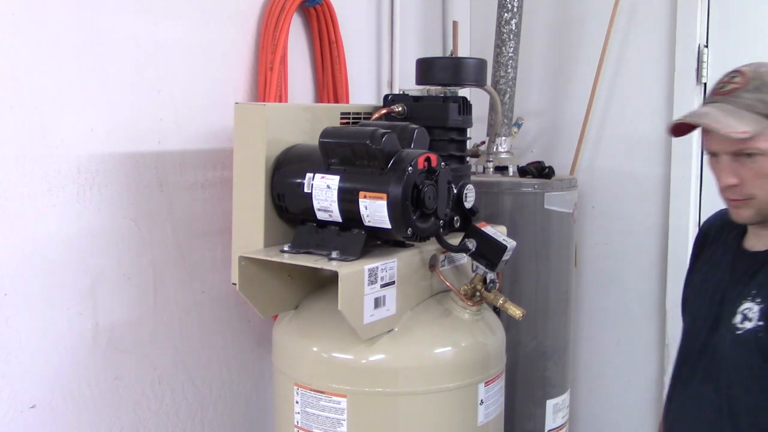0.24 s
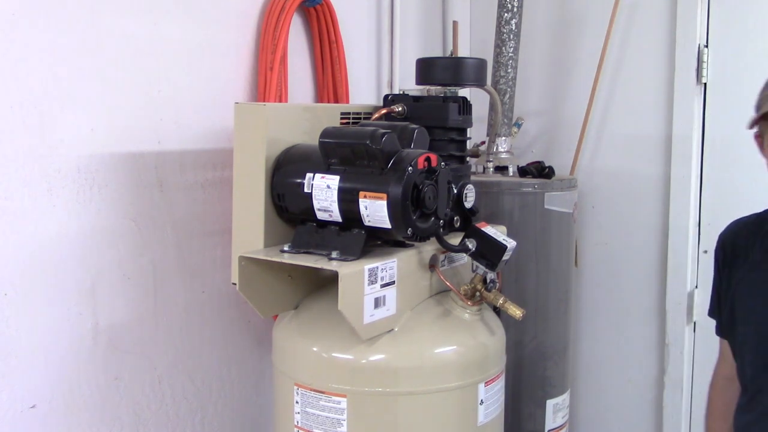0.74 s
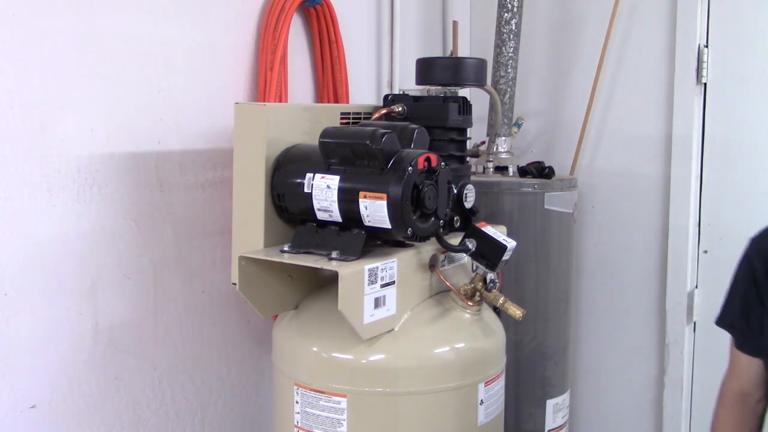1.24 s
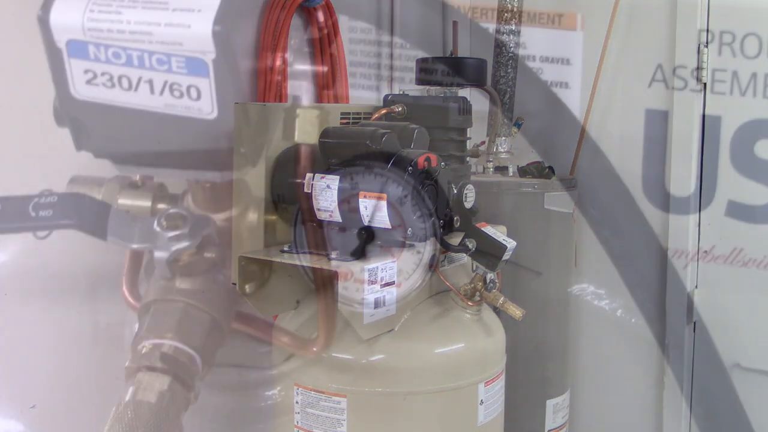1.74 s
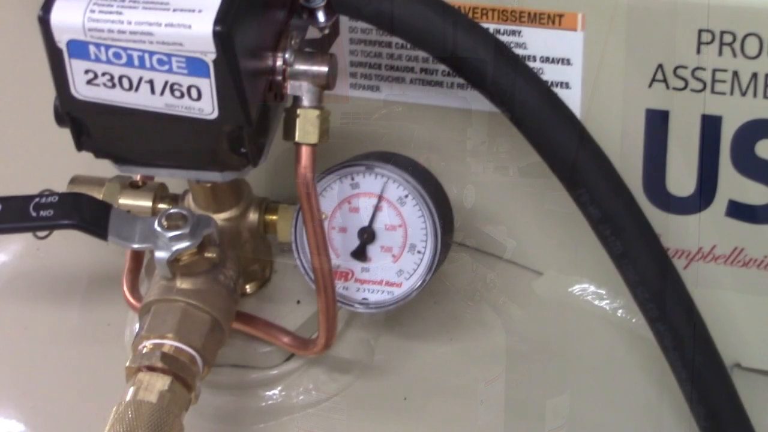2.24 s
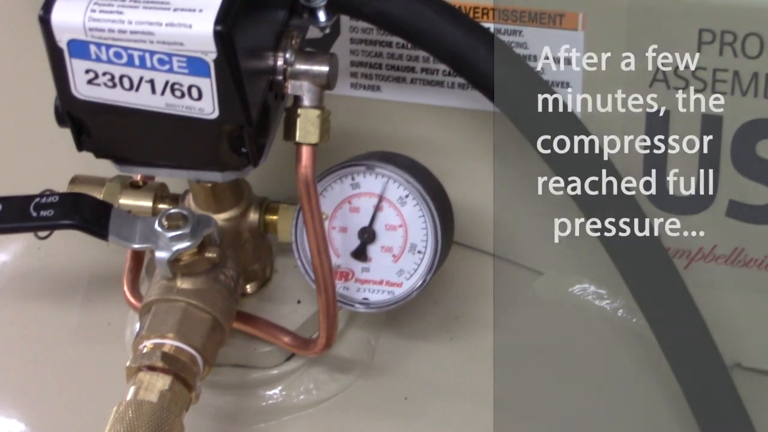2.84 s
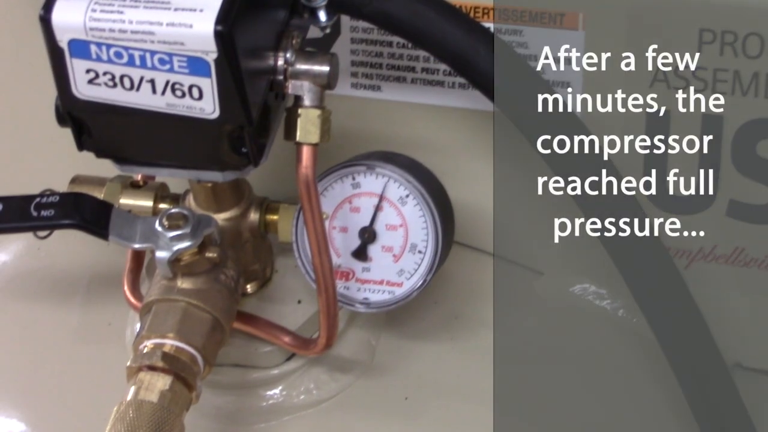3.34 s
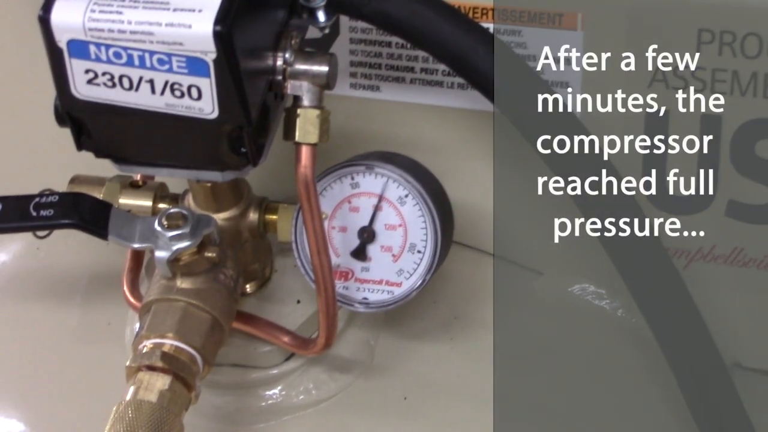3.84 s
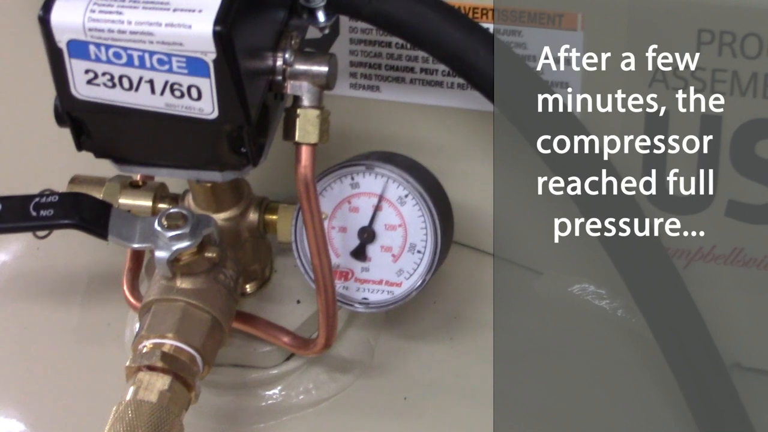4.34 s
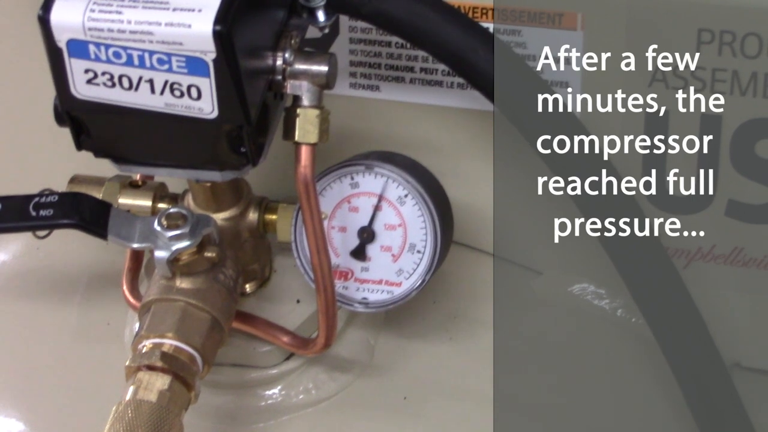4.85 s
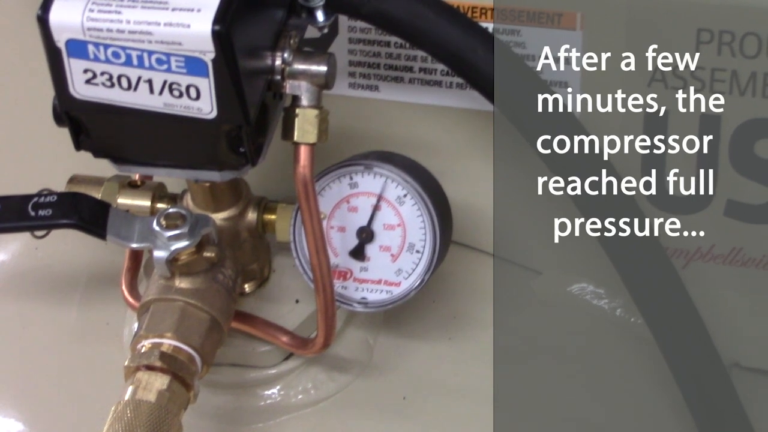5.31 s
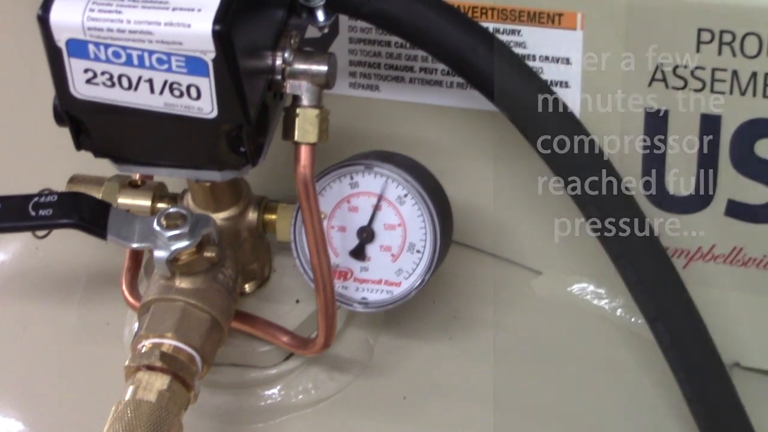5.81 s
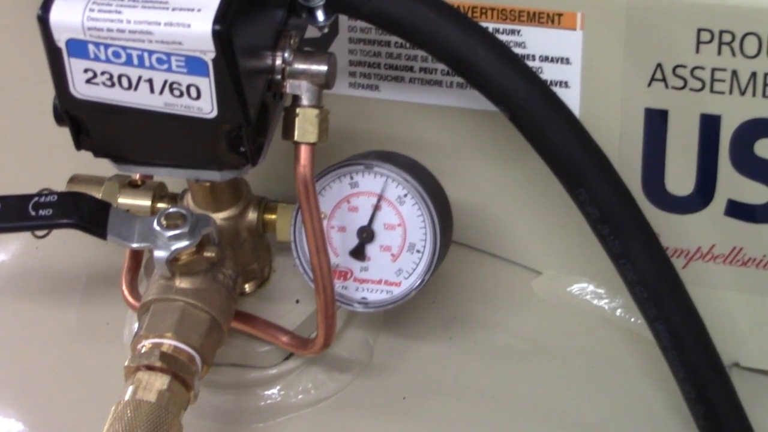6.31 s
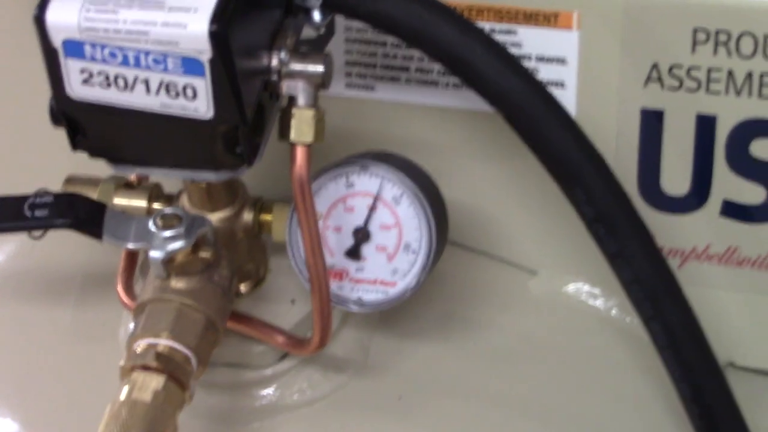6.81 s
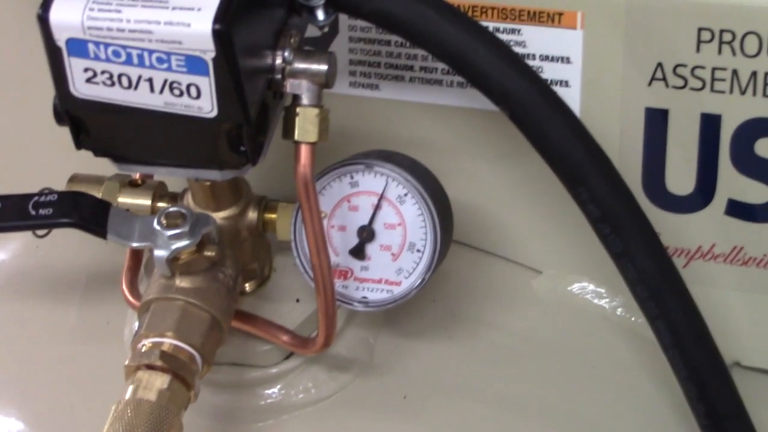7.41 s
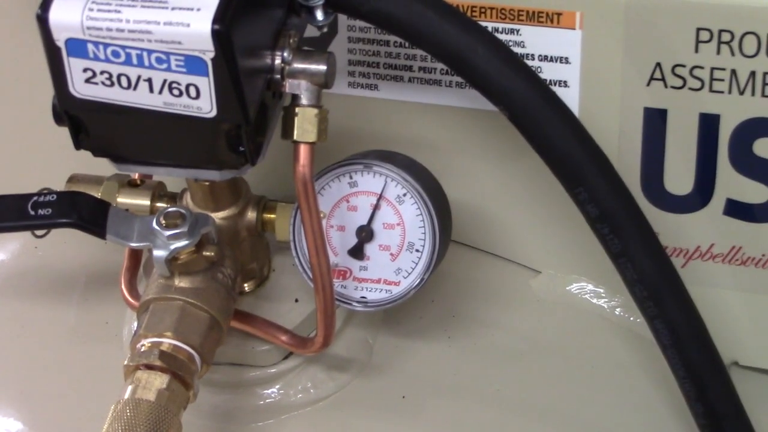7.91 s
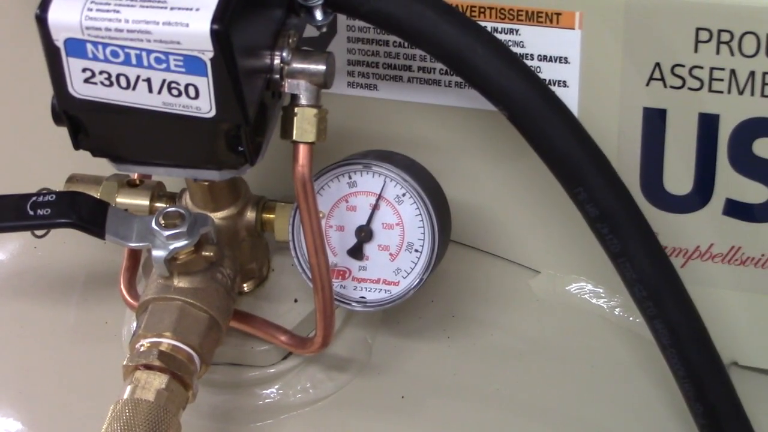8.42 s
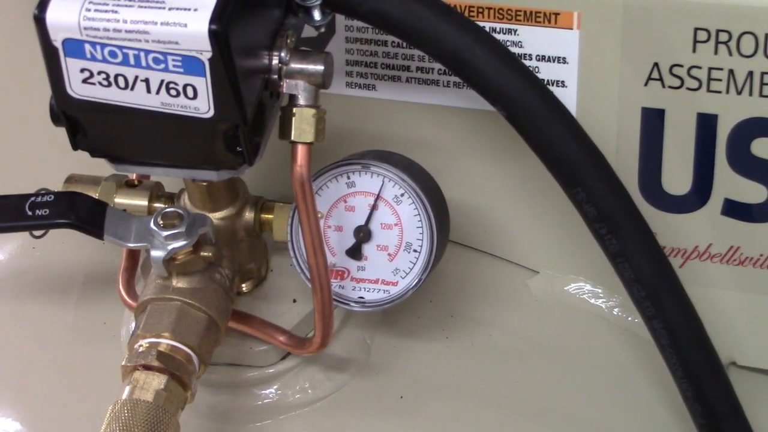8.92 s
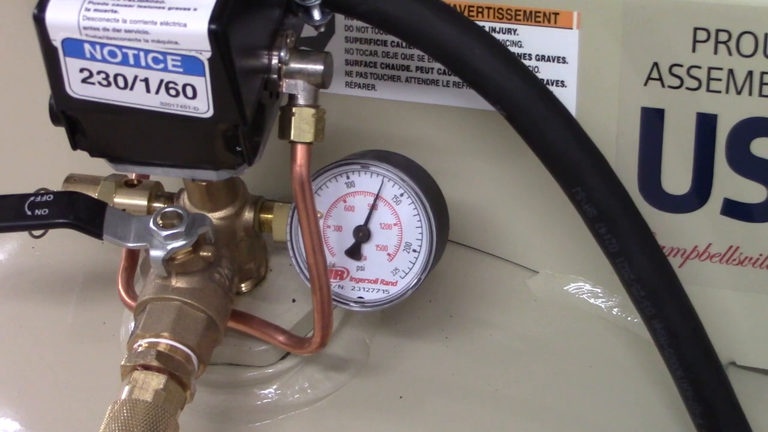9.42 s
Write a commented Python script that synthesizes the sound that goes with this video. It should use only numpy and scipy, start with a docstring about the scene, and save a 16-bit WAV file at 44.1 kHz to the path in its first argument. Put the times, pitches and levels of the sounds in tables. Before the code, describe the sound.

An electric air compressor runs loudly in a garage, a fast chugging drone with mechanical clatter. It is heard first from across the room, then close up, where a loose fitting buzzes on and off. A switch clicks and the pump coasts to rest in slowing thumps and brief squawks. At the same moment a sharp hiss of air starts, holds for a few seconds and dies away.

```python
"""A belt-driven two-cylinder air compressor chugs in a garage, heard first from across the room.
The piston puffs merge into a drone; valves and belt clatter on every turn of the crank.
Then we are beside its gauge, where a loose fitting buzzes in bouts. The pressure switch clicks off:
the pump coasts to rest in ever slower falling thumps, its intake reeds squawking between them,
while the unloader valve hisses the line empty over a faint ring of the tank."""
import sys
import numpy as np
from scipy import signal
from scipy.fft import rfft, irfft, next_fast_len
from scipy.io import wavfile
from scipy.ndimage import uniform_filter1d, minimum_filter1d

SR = 44100
rng = np.random.default_rng(int(sys.argv[2]) if len(sys.argv) > 2 else 0)


def materialize(psi):
    """Save the field psi as 16-bit PCM at rate SR to the path in sys.argv[1].

    A 1-D psi becomes a single channel; in a 2-D psi each row is a channel.
    """
    bounded = np.clip(np.atleast_2d(psi).T, -1, 1)
    quanta = np.round(bounded * 32767).astype(np.int16)
    wavfile.write(sys.argv[1], SR, quanta)


N = 426006
TIME = np.arange(N) / SR

MOVE_S, TRIP_S, EMPTY_S = 1.875, 6.609, 9.053  # cut to close up; the switch trips; the hiss starts to die
FILLING_HZ, FULL_HZ = 25.1113, 24.7278  # crank speed: filling the tank; labouring against full pressure
COAST_S, FIRST_STROKE = .953, .6  # run-down time; share of a stroke before the first free thump

# tone of the quiet garage (frequency [Hz], gain [dB])
ROOM_TONE = [(30, -14), (150, 0.0), (800, -2), (8000, -16)]
# tone of the stereo width (frequency [Hz], gain [dB])
WIDTH = [(70, -16), (170, -47), (350, -33.5), (1300, -27.5), (4500, -21.5), (9000, -22.5), (13000, -36)]
# steel modes of the tank under the hiss (start [s], pitch [Hz], level [dB])
TANK_MODES = [(7.6, 333.8, -64.5), (6.8, 737.5, -63), (6.7, 807.5, -68), (6.7, 823.6, -66.5)]

# tone of the air jet (frequency [Hz], gain [dB])
JET_TONE = [(100, -43), (400, -33.5), (730, -21.5), (1400, -21), (3050, -16), (4500, -8), (6800, -4),
            (7600, -5), (10400, -10.5), (15500, -7)]
# peaks and hollows that the switch housing gives the jet (centre [Hz], width [Hz], gain [dB])
HOUSING_PEAKS = [(3600, 120, 3), (4180, 300, -1), (4850, 490, 9.5), (5670, 270, 5.5), (6200, 240, -3),
                 (6860, 840, 8.5), (7510, 240, -8.5), (8350, 250, -4.5), (8720, 380, 4.5), (9780, 440, 3.5),
                 (10100, 290, -1), (11840, 400, 4), (12200, 270, -6), (12900, 700, 5), (13950, 400, -11),
                 (15000, 600, -0.5)]
# bands of escaping air, each with its own swell
# (low edge [Hz], high edge [Hz], level [dB], swell [dB], crest time [s], half length of swell [s])
AIR_BANDS = [(9900, 19500, -33.6, 4.5, 7.2, 0.9), (7500, 10000, -35.2, 1.3, 7.8, .7),
             (6150, 7500, -35, 3.5, 8.24, 0.83), (4300, 6150, -38.5, 7.5, 8.73, 0.97),
             (3330, 4350, -44.5, 3.5, 8.2, 0.56), (73, 3340, -43.5, 3, 7.14, 1)]

# intake and tank modes that the coasting pump sets ringing (pitch [Hz], ring time [s], gain [dB])
BODY_MODES = [(223, 0.46, 7), (285, .4, -5), (417, 0.56, 8), (546, .45, 7), (701, .3, 3), (884, 0.47, 3),
              (1071, .4, 2)]
# tone of the fluttering reeds and the air drawn past them (frequency [Hz], gain [dB])
REED_TONE = [(70, -28), (150, -15), (215, -2), (420, -2), (500, -4.5), (640, -2), (710, 2), (800, -4.5),
             (915, 2), (1080, -2.5), (1160, -9), (1800, -47)]
# how the intake passes the thump of an unloaded stroke (frequency [Hz], gain [dB])
INTAKE_TONE = [(50, -20), (90, -7), (150, -5), (215, 3), (420, -0.5), (600, -2), (1400, -22)]
# the last strokes, slow enough to hear one by one (start [s], peak before the intake [dB], pitch [Hz])
LAST_STROKES = [(6.977, -25, 235), (7.008, -22, 245), (7.043, -25, 330), (7.082, -23.5, 396),
                (7.124, -25, 230), (7.172, -24.5, 355), (7.224, -24, 348), (7.287, -23, 328),
                (7.368, -33, 273), (7.388, -32.5, 412)]

# tone of the rattle that comes back on every turn (frequency [Hz], gain [dB])
REPEAT_TONE = [(1400, 1.5), (3300, 0.5), (6000, -8.0), (12000, -3.0)]
# tone of the loose fitting's buzz (frequency [Hz], gain [dB])
BUZZ_TONE = [(2000, -40), (4300, 2), (6200, 4), (9000, -30)]
# bouts in which the fitting buzzes harder (start [s], length [s], level [dB])
BUZZ_BOUTS = [(2.0, 0.49, -57), (2.74, 0.46, -50.5), (3.5, 0.98, -54), (3.75, 0.57, -53), (4.58, .32, -56),
              (5.25, 0.84, -48.5), (6.1, 0.5, -55)]
# ring of the fitting, the belt guard, and the fins with the copper pipe (centre [Hz], width [Hz], gain [dB])
FITTING_RING = [(4670, 700, 10.5), (5400, 260, 18.5), (5780, 150, 18.5), (6240, 84, 13)]
GUARD_RING = [(1380, 39, 3), (2530, 97, -1), (3490, 260, 4.5), (4230, 130, 5.5), (4800, 370, 3)]
FIN_RING = [(1830, 50, -1), (2700, 100, -6.5), (3560, 40, 5), (7160, 150, 2), (12200, 150, 6),
            (12750, 250, 10)]
# tone of the valve and belt clatter, across the room and close up (frequency [Hz], gain [dB])
FAR_CLATTER = [(30, -30), (70, -19), (130, -1.5), (300, 16.5), (950, 10), (1200, 8), (1400, 5.5),
               (1750, -3), (2100, 5), (3000, -1), (3600, 1.5), (4900, 1), (7000, -5), (11000, -17),
               (16000, -28)]
NEAR_CLATTER = [(30, -24), (120, -3.5), (250, 9), (700, 9), (1050, 11), (1250, 1), (1650, -1.5), (2100, -1),
                (2800, -3), (4300, -8), (5600, -6), (6600, -12), (9500, -19), (16000, -34)]
# thin tones of the casting (pitch [multiple of crank speed], level [dB])
FAR_SINGING = [(59, -52), (75, -56), (87, -57)]
NEAR_SINGING = [(76, -56), (82, -52.5), (92, -58), (101, -60), (118, -62), (144, -61)]
# overtones of the pump's drone (pitch [multiple of crank speed], relative level [dB])
FAR_OVERTONES = [(4, -27), (5, -23), (6, -16), (7, -31), (8, -12), (9, -17), (10, -5), (11, -17), (12, -2),
                 (13, -12), (14, -6), (15, -24), (16, 0), (17, -18), (18, -9), (19, -12), (20, -10),
                 (21, -10), (22, -8), (23, -16), (24, -9), (25, -18), (26, -14), (27, -22), (28, -11),
                 (29, -16), (30, -26), (31, -27), (32, -11), (33, -13), (34, -16), (35, -22), (36, -17),
                 (37, -19), (38, -13), (39, -21), (40, -19), (41, -23), (42, -13), (43, -26), (44, -28)]
NEAR_OVERTONES = [(1, -37), (2, -33), (3, -42), (4, -28), (5, -33), (6, -31), (7, -30), (8, -11), (9, -7),
                  (10, -4), (11, -8), (12, 0), (13, -14), (14, -1), (15, -10), (16, -2), (17, -20),
                  (18, -8), (19, -10), (20, -21), (21, -13), (22, -2), (23, -16), (24, -11), (25, -20),
                  (26, -9), (27, -10), (28, -20), (29, -4), (30, -6), (31, -6), (32, -13), (33, -16),
                  (34, -15), (35, -11), (36, -5), (37, -24), (38, -8), (39, -16), (40, -12), (41, -19),
                  (42, -13), (43, -11), (44, -9), (45, -24), (46, -18), (49, -30), (50, -26)]
# puffs within one crank turn: two low piston thumps and the higher chuffs of the valves
# (place [turns], centre [Hz], width [log frequency], weight [dB], lag of lows behind highs [turns])
FAR_PUFFS = [(.349, 559, .22, 4.8, -.038), (.485, 1200, .1, -1.8, -.136), (.554, 357, .48, 1.8, -.073),
             (.774, 649, .16, 4.7, -.009), (.808, 320, .54, -7.2, .062)]
NEAR_PUFFS = [(.069, 727, .16, 1.6, .026), (.222, 786, .12, 0, -.011), (.312, 1028, .19, -4.1, -.1),
              (.621, 239, .36, -2.8, .25), (.728, 839, .45, -4.4, -.11), (.974, 606, .38, -9.5, .001),
              (.991, 208, .26, 3.1, .071)]


def undb(db):
    """Decibels to gain."""
    return 10 ** (np.asarray(db) / 20)


def unit(x):
    """Scale to rms 1."""
    return x / np.sqrt(np.mean(x ** 2))


def ramp(start_s, length_s):
    """A straight fade from 0 to 1."""
    return np.clip((TIME - start_s) / length_s, 0, 1)


def wander(rate_hz):
    """Smooth random drift with rms 1."""
    hold = max(int(SR / rate_hz), 1)
    steps = np.repeat(rng.standard_normal(N // hold + 1), hold)
    return unit(uniform_filter1d(steps, hold)[:N])


def colour(x, curve, bells=()):
    """EQ: a smooth curve with narrow peaks and hollows on top."""
    size = next_fast_len(len(x) + 4096)
    hz = np.arange(size // 2 + 1) * SR / size + 1
    curve_hz, curve_db = np.transpose(curve)
    db = np.interp(np.log(hz), np.log(curve_hz), curve_db)
    for centre, width, height in bells:
        db = db + height * np.exp(-2 * ((hz - centre) / width) ** 2)
    return irfft(rfft(x, size) * undb(db), size)[:len(x)]


def band(x, lo_hz, hi_hz):
    """Steep band-pass."""
    return signal.sosfilt(signal.butter(4, [lo_hz, hi_hz], "band", fs=SR, output="sos"), x)


def reverb(x, t60, wet_db):
    """Direct sound followed by a dense tail of reflections."""
    t = np.arange(SR // 2) / SR
    tail = rng.standard_normal(len(t)) * np.exp(-np.log(1000) * t / t60) * (1 - np.exp(-t / 0.0077))
    echo = signal.fftconvolve(x, tail / np.linalg.norm(tail))[:N]
    return (x + undb(wet_db) * echo) / np.hypot(1, undb(wet_db))


def room_tone(level_db=-63):
    """A soft, dark bed of garage air."""
    return undb(level_db) * unit(colour(rng.standard_normal(N), ROOM_TONE))


def tank(fade_in_s=0.83):
    """A few steel modes sing faintly as the air escapes."""
    out = 0
    for start, hz, db in TANK_MODES:
        gain = undb(db + 0.79 * wander(3.8)) * ramp(start, fade_in_s)
        out = out + gain * np.sqrt(2) * np.sin(2 * np.pi * hz * TIME)
    return out


def whistle(at_s=7.745, half_length_s=.028, hz=3500, width_hz=160, level_db=-40):
    """The jet catches a pipe resonance for an instant."""
    note = unit(band(rng.standard_normal(N), hz - width_hz / 2, hz + width_hz / 2))
    return undb(level_db) * np.exp(-((TIME - at_s) / half_length_s) ** 2) * note


def switch(level_db=-29, decay_s=.004):
    """The contacts of the pressure switch spring apart with one dry click."""
    fade = (TIME >= TRIP_S) * np.exp(-np.maximum(TIME - TRIP_S, 0) / decay_s)
    return undb(level_db) * fade * unit(band(rng.standard_normal(N), 1500, 7000))


def unloader(rough_db=0.06, spit_db=-1.0, spits_per_s=90):
    """A turbulent, slightly spitting jet; as pressure falls its weight sinks from the top downward."""
    spits = (rng.random(N) < spits_per_s / SR) * rng.standard_normal(N)
    spits = signal.lfilter([1], [1, -np.exp(-1 / (0.00052 * SR))], np.abs(spits))
    turbulence = undb(rough_db * wander(250)) + undb(spit_db) * spits
    age = np.maximum(TIME - TRIP_S, 0)
    puff_db = 4.5 * np.exp(-age / 0.025)  # first puff as the valve lifts
    opening_db = -5.5 * np.exp(-age / 0.24)  # it snaps part way, then eases fully open
    dying_s = np.maximum(TIME - EMPTY_S, 0)
    hiss = 0
    for lo_hz, hi_hz, db, swell_db, crest_s, half_length_s in AIR_BANDS:
        jet = reverb(rng.standard_normal(N) * turbulence, t60=0.068, wet_db=-7)
        air = unit(band(colour(jet, JET_TONE, HOUSING_PEAKS), lo_hz, hi_hz))
        swell = np.exp(-((TIME - crest_s) / half_length_s) ** 2)
        fall_db_per_s = 18 if lo_hz < 1000 else 22  # the low rush hangs on longer
        hiss = hiss + air * undb(db + swell_db * swell - fall_db_per_s * dying_s)
    return hiss * undb(puff_db + opening_db + 0.43 * wander(35)) * ramp(TRIP_S, 0.0015)


def body(x):
    """The intake and the tank ring on after whatever shakes them."""
    ring = 0
    for hz, t60, db in BODY_MODES:
        q = np.pi * hz * t60 / np.log(1000)
        ring = ring + undb(db) * signal.lfilter(*signal.iirpeak(hz, q, fs=SR), x)
    return x + ring


def reeds(speed, turns, flutter_db=-30.5, linger_db=-52, squawk_db=-38, squawk_hz=880, rise_hz=750):
    """Intake reeds flutter and squawk between coasting strokes; the flutter lingers after the stop."""
    strokes = 2 * (turns - np.interp(TRIP_S, TIME, turns)) - FIRST_STROKE
    slowing_db = 6 * np.log2(speed + 1e-9)
    pulse_db = 2.5 * np.cos(2 * np.pi * (strokes - 0.64))
    pumped = undb(flutter_db + slowing_db + pulse_db)
    lingering = undb(linger_db) * np.sqrt(1 - ramp(TRIP_S + COAST_S, 0.33))
    flutter = unit(colour(rng.standard_normal(N), REED_TONE)) * np.hypot(pumped, lingering)
    off_peak = (strokes - .7 + .5) % 1 - .5  # each rising squawk peaks 0.7 of a stroke late
    hz = (squawk_hz + rise_hz * off_peak) * (1 + 0.019 * wander(300))
    draw = np.sqrt(np.minimum(speed / 0.24, 1))  # near a stall the pistons barely draw air
    gain = undb(squawk_db) * np.exp(-(off_peak / 0.11) ** 2) * draw
    squawk = gain * np.sqrt(2) * np.sin(2 * np.pi * np.cumsum(hz) / SR)
    return (flutter + squawk) * ramp(TRIP_S, 0.023)


def coasting(stroke_db=-20.5, stroke_hz=260, rise_s=.0013, sweep=1.5, sweep_s=0.002):
    """Piston thumps, two a turn: each falls onto its note, and lasts longer as the crank slows."""
    strokes_to_rest = FULL_HZ * COAST_S
    travel = np.arange(FIRST_STROKE, strokes_to_rest) / strokes_to_rest
    starts = TRIP_S + COAST_S * (1 - np.sqrt(1 - travel)) - rise_s
    starts = starts[starts < LAST_STROKES[0][0] - .5 / FULL_HZ]
    scatter = rng.standard_normal((len(starts), 2))
    quick_strokes = [(start, stroke_db + louder_db, stroke_hz * np.exp(.13 * detune))
                     for start, (louder_db, detune) in zip(starts, scatter)]
    t = np.arange(SR // 10) / SR
    thumps = np.zeros(N)
    for start, db, hz in quick_strokes + LAST_STROKES:
        speed = max(1 - (start - TRIP_S) / COAST_S, .1)
        age = t * speed / rise_s
        pitch = hz * (1 + sweep * speed * np.exp(-t / sweep_s))
        phase = 2 * np.pi * np.cumsum(pitch) / SR
        at = int(start * SR)
        thumps[at:at + len(t)] += undb(db) * age * np.exp(1 - age) * np.sin(phase)
    return reverb(colour(thumps, INTAKE_TONE), t60=0.57, wet_db=-7)


def singing(turns, tones, waver_db=0.5):
    """Thin steady tones of the casting, locked to the crank."""
    out = 0
    for multiple, db in tones:
        gain = undb(db + waver_db * wander(5))
        out = out + gain * np.sqrt(2) * np.sin(2 * np.pi * (multiple * turns + rng.random()))
    return out


def clatter(turns, repeat, pulse_db):
    """Valve and belt rattle, pulsing with the strokes: part comes back on every turn, part is new."""
    pattern = rng.standard_normal(SR // 25)
    place = (turns + 0.00029 * wander(25)) % 1
    looped = colour(np.interp(place, np.linspace(0, 1, len(pattern)), pattern), REPEAT_TONE)
    looped = unit(band(band(looped, 1150, 16000), 1150, 16000))
    fresh = reverb(rng.standard_normal(N), t60=0.081, wet_db=-6)
    pulse = np.cos(4 * np.pi * turns) + 0.7 * np.cos(2 * np.pi * turns)
    return (repeat * looped + fresh) * undb(pulse_db * pulse)


def fitting(turns, rest_db=-57.5, edge_s=0.095, wander_db=1.7):
    """A loose fitting buzzes with the crank, faintly throughout and harder in swelling bouts."""
    gain = undb(rest_db)
    for start, length, db in BUZZ_BOUTS:
        bout = ramp(start, edge_s) - ramp(start + length, edge_s)
        gain = np.hypot(gain, undb(db) * bout)
    buzz = colour(clatter(turns, repeat=1.0, pulse_db=-0.2), BUZZ_TONE, FITTING_RING)
    return gain * undb(wander_db * wander(7)) * unit(buzz)


def valve_slap(turns, place, db, half_length_turns=0.028):
    """An accent for the rattle: its gain jumps once a turn, as a valve slaps shut."""
    off_peak = (turns - place + .5) % 1 - .5
    return undb(db * np.exp(-(off_peak / half_length_turns) ** 2))


def drone(turns, overtones, puffs, scatter_rad, waver_db, bright_db):
    """The puffs of each turn merge into a chugging drone; intake and room weight each overtone."""
    place, centre_hz, width, puff_db, glide = np.transpose(puffs)
    out = 0
    for k, db in overtones:
        # the puffs nearest in pitch set this overtone's timing within the turn
        above = np.log(k * FULL_HZ / centre_hz)
        arrival = place - glide * (above - 1)
        weight = undb(puff_db) * np.exp(-.5 * (above / width) ** 2)
        lag = np.angle(np.sum(weight * np.exp(2j * np.pi * k * arrival)))
        lag = lag + scatter_rad * wander(30)  # no two turns are quite alike
        gain = undb(db + bright_db * k / len(overtones) + waver_db * wander(6))
        out = out + gain * np.cos(2 * np.pi * k * turns - lag)
    return unit(out)


def crank():
    """Share of working speed, and turns made: steady under load, then friction slows it evenly."""
    speed = 1 - ramp(TRIP_S, COAST_S)
    working_hz = np.where(TIME < MOVE_S, FILLING_HZ, FULL_HZ)
    return speed, np.cumsum(speed * working_hz) / SR


def pump_far(turns, drone_db=-25, rattle_db=-32):
    """The loaded pump from across the room, its clatter ringing the belt guard."""
    chug = drone(turns, FAR_OVERTONES, FAR_PUFFS, scatter_rad=0.056, waver_db=0.6, bright_db=3)
    tones = undb(drone_db) * chug + singing(turns, FAR_SINGING)
    rattle = clatter(turns, repeat=0.39, pulse_db=0.5) * valve_slap(turns, place=0.836, db=3)
    return tones + undb(rattle_db) * unit(colour(rattle, FAR_CLATTER, GUARD_RING))


def pump_near(speed, turns, drone_db=-23.5, rattle_db=-35.5):
    """The pump close up: the drone drops out at the trip, the rattle dies away with the speed."""
    chug = drone(turns, NEAR_OVERTONES, NEAR_PUFFS, scatter_rad=0.096, waver_db=0.87, bright_db=1)
    tones = undb(drone_db) * chug + singing(turns, NEAR_SINGING)
    slaps = valve_slap(turns, place=0.776, db=3.5) * valve_slap(turns, place=0.465, db=1.5)
    rattle = clatter(turns, repeat=0.58, pulse_db=0.2) * slaps
    rattle = undb(rattle_db) * unit(colour(rattle, NEAR_CLATTER, FIN_RING)) + fitting(turns)
    return tones * (1 - ramp(TRIP_S, 0.065)) + rattle * speed ** 3


def scene():
    """Everything sits in the centre; only a faint, diffuse wash differs between the ears."""
    speed, turns = crank()
    bed = room_tone()
    close_up = ramp(MOVE_S, 0.0037)
    pump = pump_far(turns) * (1 - close_up) + pump_near(speed, turns) * close_up
    run_down = body(coasting() + reeds(speed, turns))
    mid = bed + pump + run_down + switch() + unloader() + whistle() + tank()
    side = colour(reverb(mid, t60=.07, wet_db=30), WIDTH)
    return np.array([mid + side, mid - side])


def record(dry, ceiling=0.18, top_hz=15800):
    """A fast limiter holds the peaks down, then the top is cut."""
    window = SR // 250
    needed_gain = np.minimum(1, ceiling / (np.abs(dry).max(axis=0) + 1e-9))
    gain = uniform_filter1d(minimum_filter1d(needed_gain, window), window)
    return signal.sosfilt(signal.ellip(10, .2, 80, top_hz, fs=SR, output="sos"), dry * gain)


dry = scene()
out = record(dry)
materialize(out)
```